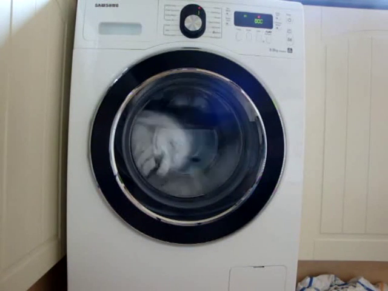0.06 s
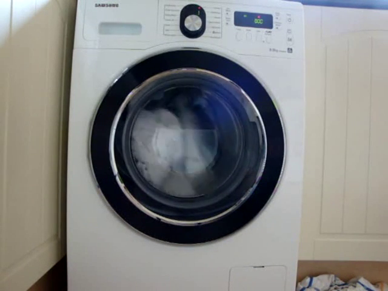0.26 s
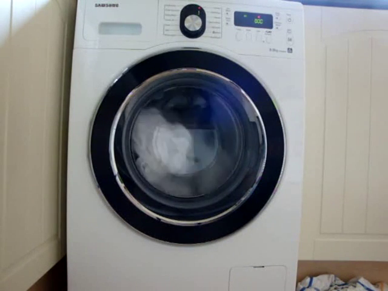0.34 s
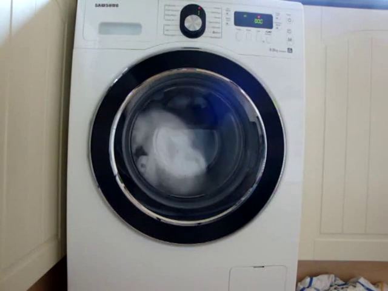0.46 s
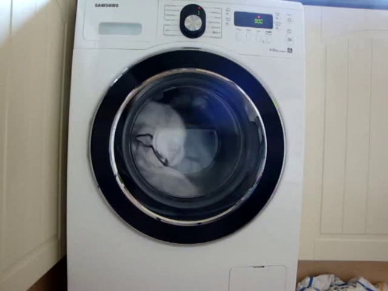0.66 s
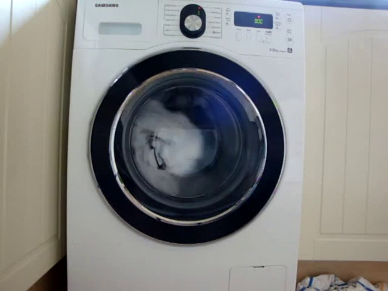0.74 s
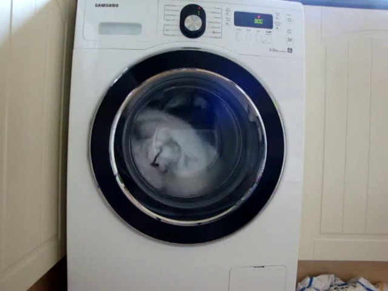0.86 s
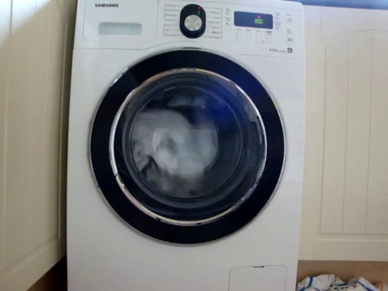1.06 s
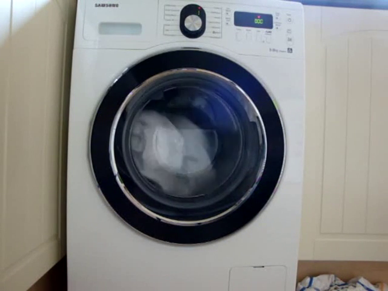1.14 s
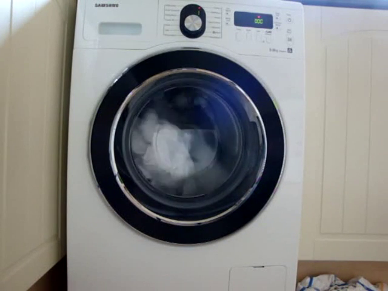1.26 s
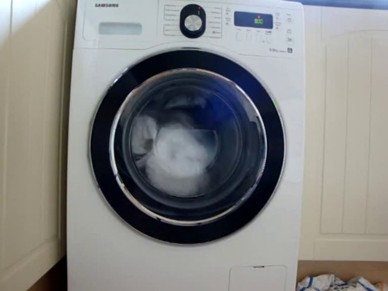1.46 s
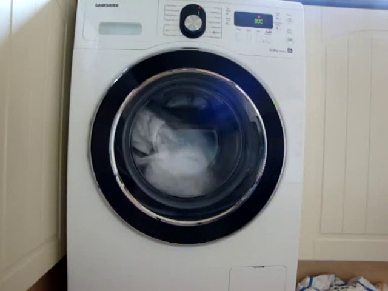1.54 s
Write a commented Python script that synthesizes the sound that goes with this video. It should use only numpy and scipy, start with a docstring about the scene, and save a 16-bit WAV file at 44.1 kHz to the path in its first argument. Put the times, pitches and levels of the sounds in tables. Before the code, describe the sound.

A washing machine turns its drum in a small room, humming steadily over a rush of drum and water. Near the start one hard knock rattles the cabinet, then the tumbling laundry gives soft thuds and a few brief pings.

```python
"""A small room, where a front-loading washing machine turns its drum.
A mains-locked magnetic hum buzzes over the rush of drum, belt and water.
The tumbling load thuds softly and now and then pings. One hard knock bounces and
rattles the thin cabinet panels. Knock and load leave a short tail in the room."""
import sys
import numpy as np
from scipy import signal
from scipy.fft import rfft, irfft
from scipy.io import wavfile
from scipy.ndimage import uniform_filter1d

SR = 44100
rng = np.random.default_rng(int(sys.argv[2]) if len(sys.argv) > 2 else 0)


def store_wav(level_fs):
    """Save 16-bit WAV to argv[1]."""
    pcm = np.round(np.clip(np.atleast_2d(level_fs), -1, 1) * 32767)
    wavfile.write(sys.argv[1], SR, pcm.T.astype(np.int16))


N = 70560
T = np.arange(N) / SR


def amp(db):
    return 10 ** (np.asarray(db) / 20)


def unit_rms(x):
    return x / np.sqrt(np.mean(x ** 2) + 1e-20)


def curve_db(points, hz):
    """Interpolates (Hz, dB) points over log frequency."""
    point_hz, db = np.transpose(points)
    return np.interp(np.log(hz + 1), np.log(point_hz + 1), db)


def coloured(x, db_at):
    """Filters x by a gain curve in dB over Hz."""
    return irfft(rfft(x) * amp(db_at(np.fft.rfftfreq(len(x), 1 / SR))), len(x))


def strike(start_s, t60_s, rise_s):
    """Time since the start, and an envelope that rises and decays."""
    t = np.maximum(T - start_s, 0)
    return t, (1 - np.exp(-t / rise_s)) * amp(-60 * t / t60_s)


def room(x, gain_db=-7.5, low_t60_s=0.42, high_t60_s=0.31):
    """Diffuse reflections; the treble dies sooner."""
    t = T[:SR // 2]
    noise = rng.standard_normal(len(t)) * np.clip((t - 0.004) / 0.0058, 0, 1)
    low = coloured(noise, lambda hz: -20 * np.log10(1 + (hz / 1200) ** 2))
    tail = low * amp(-60 * t / low_t60_s) + (noise - low) * amp(-60 * t / high_t60_s)
    return amp(gain_db) * signal.fftconvolve(x, tail / np.linalg.norm(tail))[:N]


def drum_rush(rms_db=-46, patch_db=1, swell_db=0.23):
    """Noise of drum, belt and water, with drifting spectral patches, a slight swell and narrow whirs."""
    # Each row: frequency in Hz, relative noise density in dB.
    spectrum = [(30, -28.5), (70, -23.5), (120, -11.5), (200, -22.5), (300, -3), (430, -4), (570, 0.5),
                (700, -13.5), (870, -10), (1250, -15.5), (2000, -15), (3000, -13), (3700, -19), (4350, -20),
                (5100, -16), (5800, -20.5), (6300, -18), (7000, -22), (10000, -26.5)]
    # Each row: centre in Hz, width in Hz, lift or dip in dB.
    whirs = [(358, 46, -3.5), (428, 18, 4.5), (535, 8.9, -5), (590, 5.3, 13), (688, 12, 9), (4405, 65, 7.5),
             (6290, 120, 2), (6860, 55, 6)]
    frames, bin_hz = N // 256 + 5, np.fft.rfftfreq(1024, 1 / SR)
    real, imag, jitter = rng.standard_normal((frames, 513, 3)).T
    swell = unit_rms(uniform_filter1d(jitter.mean(0), size=20))
    across_bins = uniform_filter1d(jitter, size=12, axis=0)
    patches = unit_rms(uniform_filter1d(across_bins, size=10, axis=1))
    gain_db = curve_db(spectrum, bin_hz)[:, None] + patch_db * patches + swell_db * swell
    noise = signal.istft((real + 1j * imag) * amp(gain_db), nperseg=1024, noverlap=768)[1][:N]
    whirring = coloured(noise, lambda hz: sum(
        db * np.exp(-((hz - mid_hz) / width_hz) ** 2) for mid_hz, width_hz, db in whirs))
    return amp(rms_db) * unit_rms(whirring)


def mains_hum(buzz_hz=99.95, waver_db=1.54, waver_hz=7.91):
    """Magnetic buzz: harmonics of twice the mains rate, each wavering in level."""
    # Each row: harmonic number, rms level in dB.
    partials = [(3, -53), (4, -45), (5, -59.5), (6, -47), (9, -74), (10, -68.5), (12, -69.5), (15, -71.5),
                (17, -67.5), (18, -72), (19, -65.5), (20, -72.5), (21, -64), (22, -66.5), (23, -62.5),
                (24, -73), (25, -77), (27, -66), (28, -61), (29, -60.5), (30, -56), (31, -70), (32, -77),
                (33, -74), (34, -79), (35, -74.5), (41, -71.5), (42, -77.5), (46, -71)]
    out = np.zeros(N)
    for k, db in partials:
        waver = np.interp(T * waver_hz, np.arange(64), rng.standard_normal(64))
        phase = 2 * np.pi * k * buzz_hz * T - 0.25 * k * k  # offsets spread the peaks
        out += amp(db + waver_db * waver) * np.sqrt(2) * np.cos(phase)
    return out


def load_thuds(rise_s=0.004, t60_s=0.031):
    """The load lands softly: puffs of band noise, held, then dying."""
    # Each row: start in seconds, level in dB, hold in seconds, centre in Hz, half-width in octaves.
    thuds = [(0.063, -55, 0.025, 1020, 0.26), (0.147, -53, 0.019, 800, .3), (0.411, -45, 0.039, 1300, 1),
             (0.428, -42, 0.046, 467, 0.21), (0.481, -41.5, 0.034, 510, 0.42),
             (0.537, -51, 0.028, 996, 0.43), (0.582, -54, 0.029, 900, 0.4),
             (0.71, -45.5, 0.0063, 2460, 0.27), (0.715, -52, 0.034, 1210, 0.78),
             (0.734, -37, 0.0082, 480, 0.45), (0.739, -57, 0.0092, 2400, .3), (0.81, -57.5, .04, 990, 0.27),
             (0.908, -52.5, .008, 1300, 0.52), (1.103, -50, 0.018, 1280, .4), (1.127, -48, 0.07, 443, 0.1),
             (1.256, -55, 0.0077, 436, .2), (1.395, -43, .004, 1900, 1), (1.448, -48, 0.012, 1200, 0.35),
             (1.461, -46.5, 0.015, 467, 0.42)]
    out = np.zeros(N)
    for start_s, db, hold_s, mid_hz, octaves in thuds:
        noise = rng.standard_normal(N)
        puff = coloured(noise, lambda hz: -6 * (np.log2((hz + 1) / mid_hz) / octaves) ** 2)
        rise = np.clip((T - start_s) / rise_s, 0, 1)
        decay = amp(-60 * np.maximum(T - start_s - hold_s, 0) / t60_s)
        out += amp(db) * unit_rms(puff) * rise * decay
    return out


def load_pings():
    """The tumbling load pings: one damped sine each time."""
    # Each row: start in seconds, level in dB, pitch in Hz, T60 in seconds.
    pings = [(.432, -36.5, 927, 0.12), (1.078, -47, 885, .08), (1.194, -34, 876, 0.11),
             (1.195, -32.5, 429, 0.15), (1.213, -42, 1072, 0.098), (1.284, -38, 866, 0.057),
             (1.432, -39.5, 876, 0.13), (1.455, -37, 1064, 0.066)]
    out = np.zeros(N)
    for start_s, db, hz, t60_s in pings:
        t, envelope = strike(start_s, t60_s, rise_s=0.0037)
        out += amp(db) * envelope * np.sin(2 * np.pi * hz * t)
    return out


def cabinet_knock(clatter_db=-6.5, pivot_hz=600):
    """A knock and its bounces clatter and ring the panels; harder blows are brighter."""
    # Each row: start in seconds, level in dB, hardness as a tilt in dB per octave.
    blows = [(.199, -26, 6.5), (.203, -10.5, -2.5), (.2102, -18, 0), (.222, -15, -4), (0.2472, -25, -2.5),
             (0.264, -27, -6), (.293, -28, -2.5), (.308, -46.5, 0), (.355, -37.5, -7)]
    # Each row: frequency in Hz, relative noise density in dB.
    clatter_spectrum = [(88, -42), (150, -30), (442, -1), (779, -6.5), (905, 2), (1030, 0.5), (1300, -2),
                        (1910, -13), (2900, -8.5), (3500, -19), (4000, -29), (5400, -25.5), (8000, -44.5),
                        (10400, -62)]
    # Panel mode frequencies in Hz.
    modes_hz = [285, 371, 414, 452, 503, 530, 692, 905, 1154, 1290, 1490, 1644, 2101, 2400, 3150]
    # Each row, one per mode: relative level in dB, T60 in seconds.
    modes = [(-22, 0.17), (-16, 0.15), (-9.5, 0.16), (-8.5, 0.32), (-20, 0.23), (-14.5, .17), (-18, 0.21),
             (-6, 0.1), (-15, 0.17), (-13.5, .17), (-22, 0.096), (-17.5, 0.12), (-22.5, .12), (-23.5, .12),
             (-36, 0.048)]
    out = np.zeros(N)
    for start_s, db, tilt_db_oct in blows:
        clatter = coloured(rng.standard_normal(N), lambda hz: (
            curve_db(clatter_spectrum, hz) + tilt_db_oct * np.log2(hz / pivot_hz + 0.0084)))
        _, envelope = strike(start_s, t60_s=0.09, rise_s=0.00031)
        out += amp(db + clatter_db) * unit_rms(clatter) * envelope
        for n, (hz, (mode_db, t60_s)) in enumerate(zip(modes_hz, modes)):
            t, envelope = strike(start_s, t60_s, rise_s=0.0008)
            gain = amp(db + mode_db + tilt_db_oct * np.log2(hz / pivot_hz))
            out += (-1) ** n * gain * envelope * np.sin(2 * np.pi * hz * t)
    return out


def scene():
    """Steady hum and rush under the impacts and their room tail; mono."""
    steady = mains_hum() + drum_rush()
    load = load_pings() + load_thuds()
    knock = cabinet_knock()
    tail = room(knock + amp(-8) * load)  # the load's sound stays mostly inside the drum
    # Thin panels radiate little bass.
    bass_cut = signal.butter(3, 262, btype="high", fs=SR, output="sos")
    return (steady + signal.sosfilt(bass_cut, knock + load + tail))[None]


def record(dry):
    """Steep low-pass band limit."""
    edge_hz = 10080
    low_pass = signal.firwin(767, edge_hz, window=("kaiser", 9), fs=SR)
    return signal.oaconvolve(dry, low_pass[None], "same")


dry = scene()
out = record(dry)
store_wav(out)
```